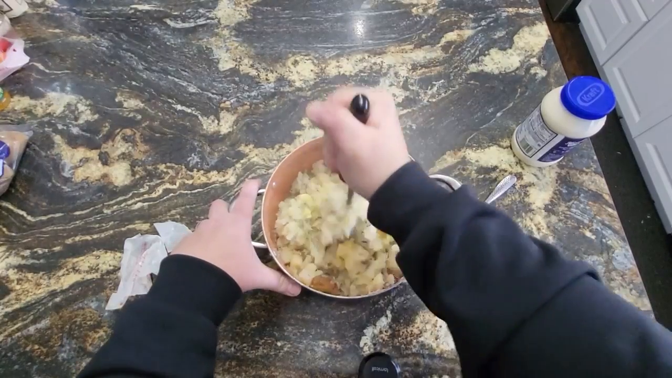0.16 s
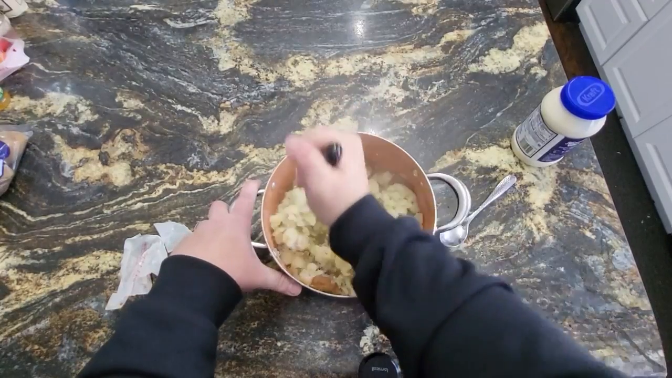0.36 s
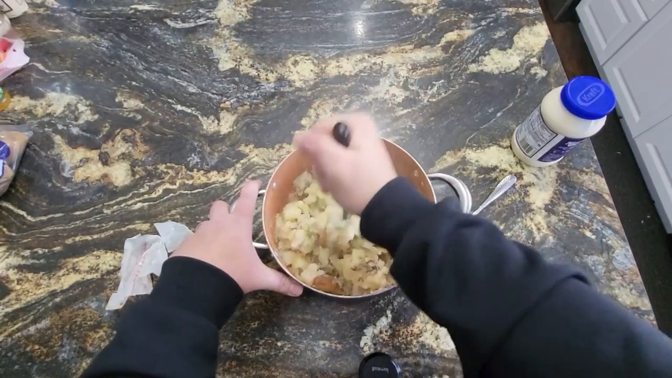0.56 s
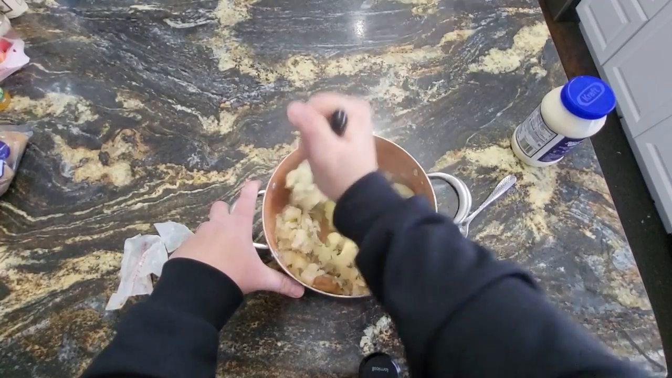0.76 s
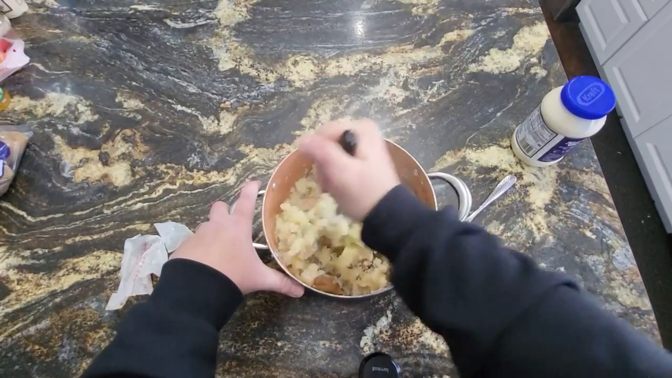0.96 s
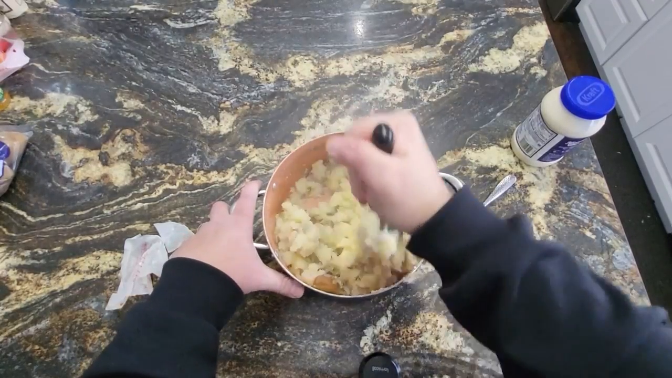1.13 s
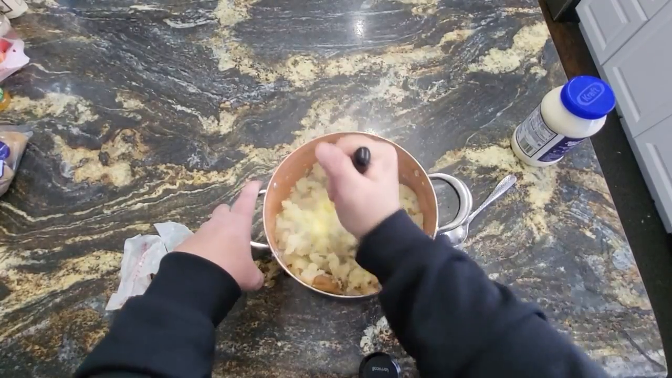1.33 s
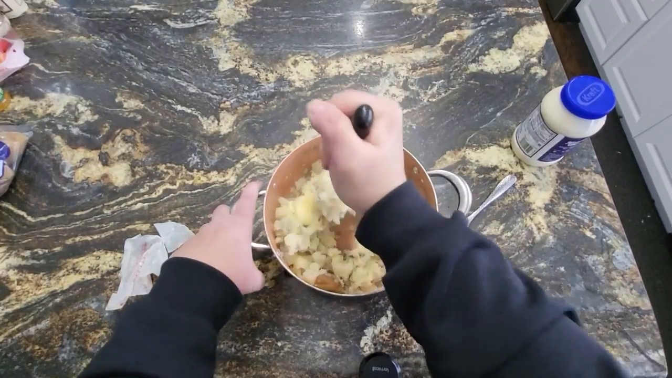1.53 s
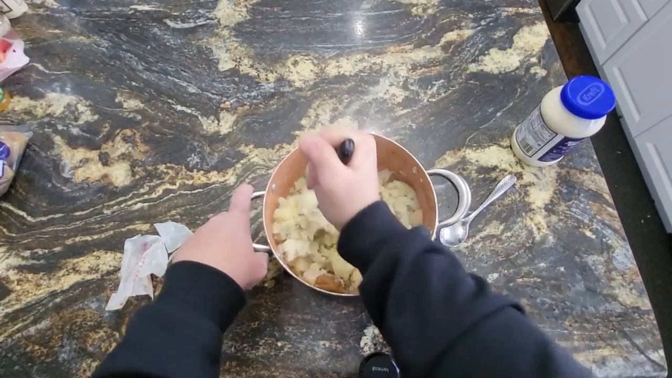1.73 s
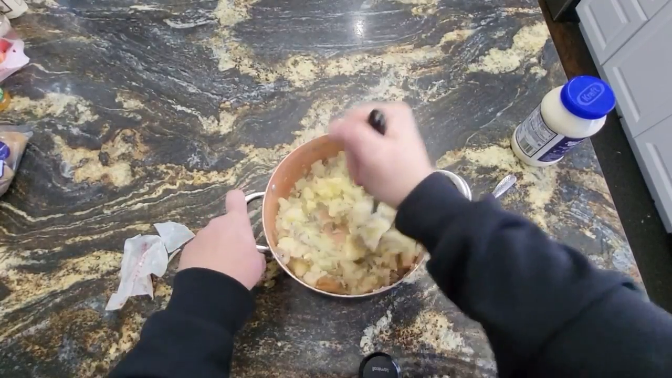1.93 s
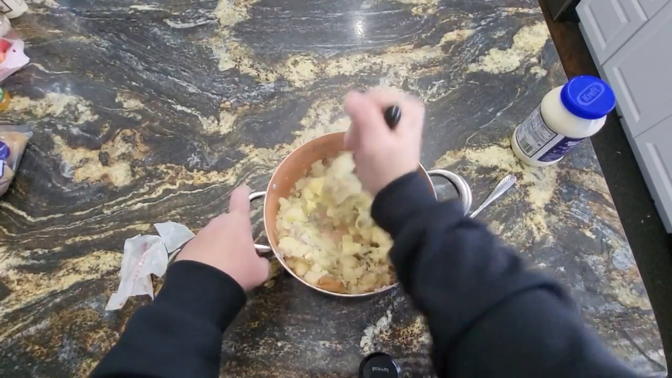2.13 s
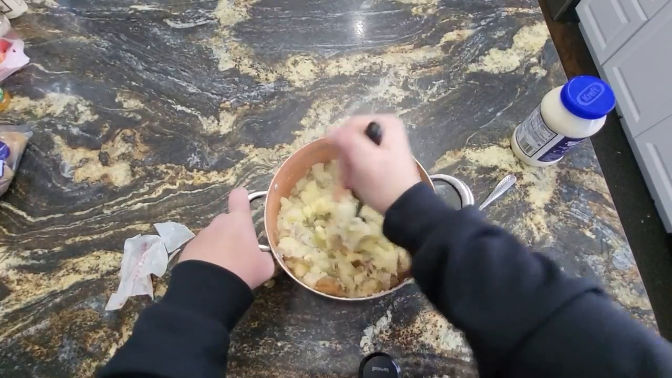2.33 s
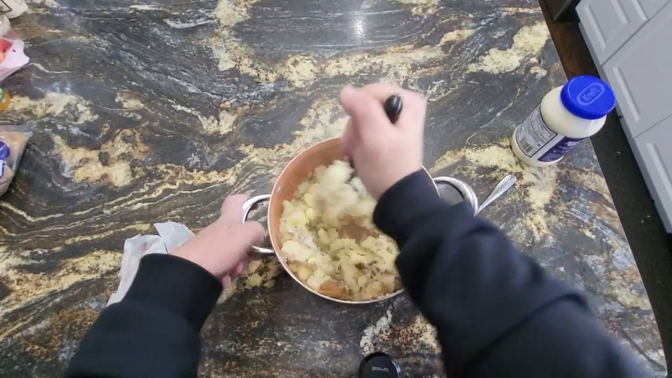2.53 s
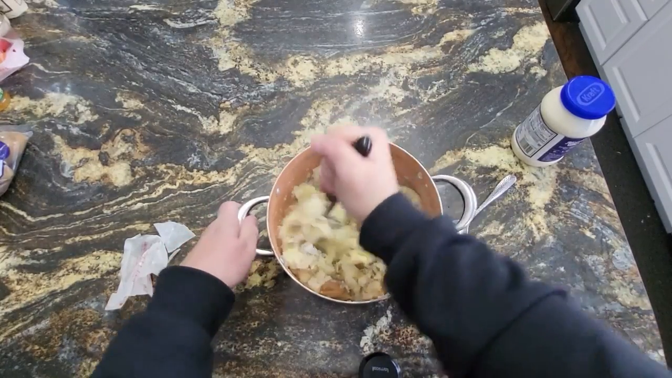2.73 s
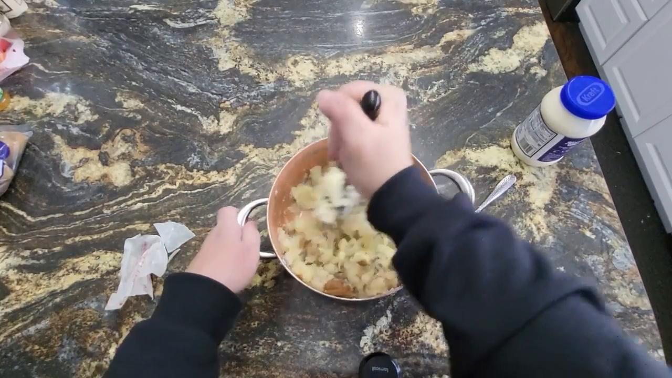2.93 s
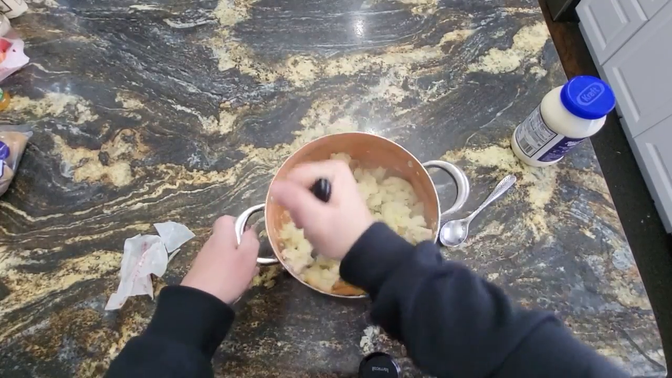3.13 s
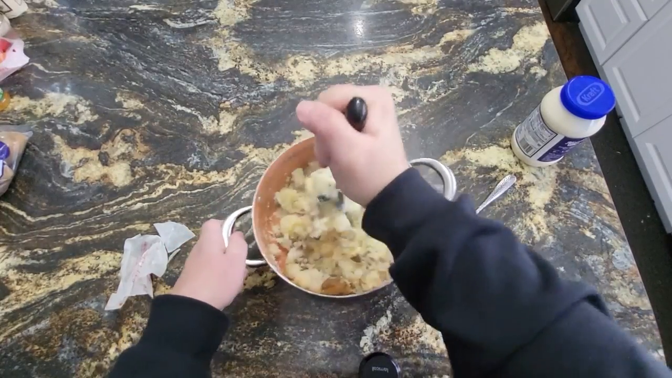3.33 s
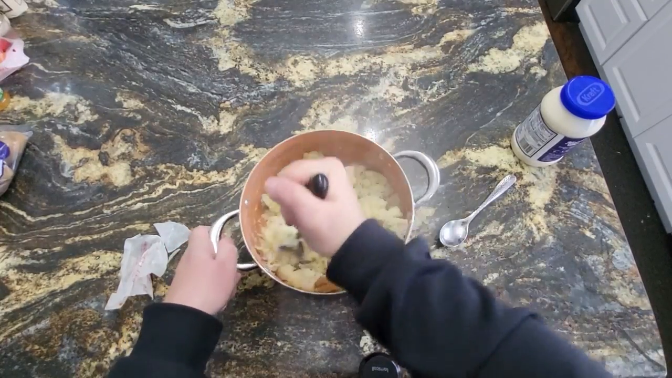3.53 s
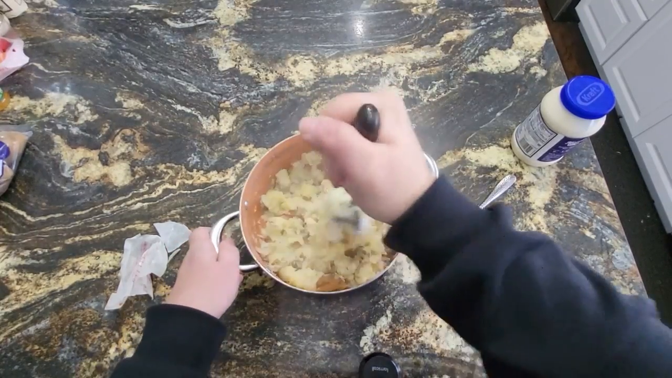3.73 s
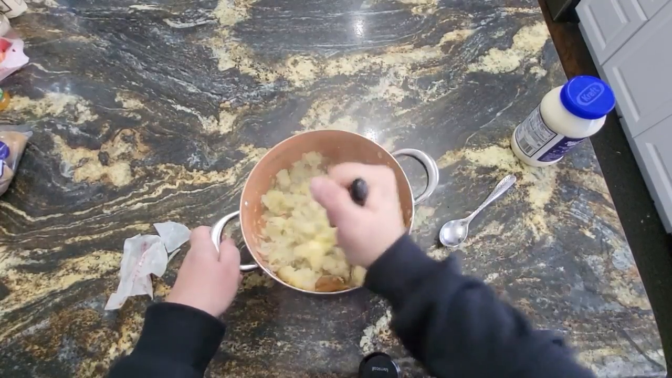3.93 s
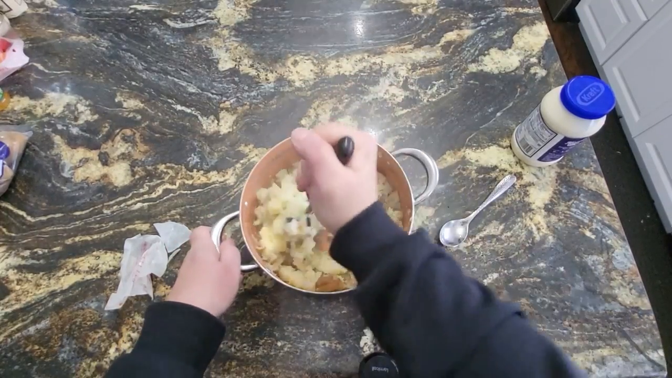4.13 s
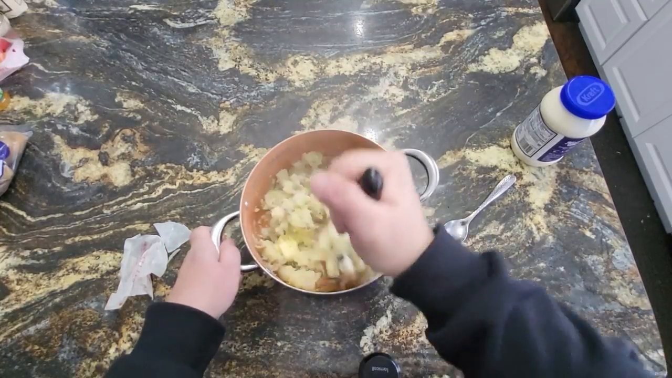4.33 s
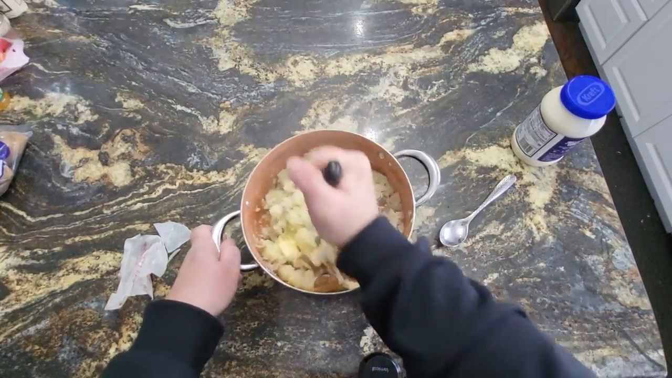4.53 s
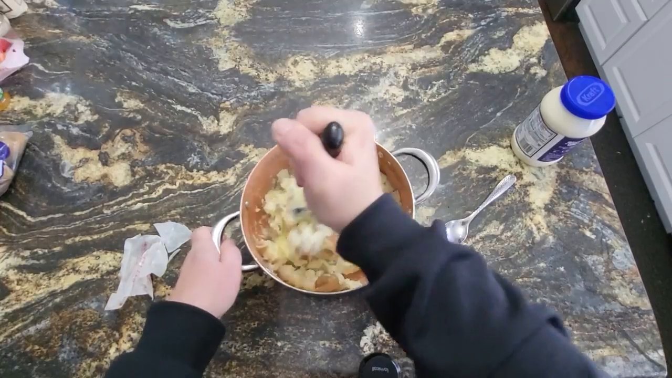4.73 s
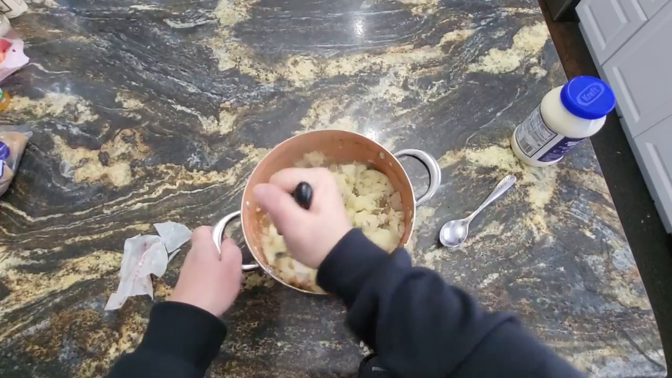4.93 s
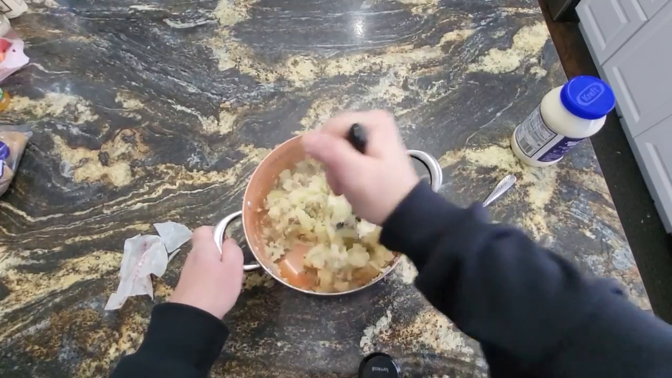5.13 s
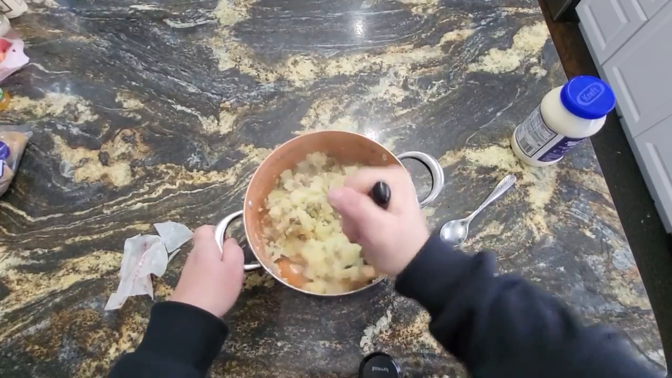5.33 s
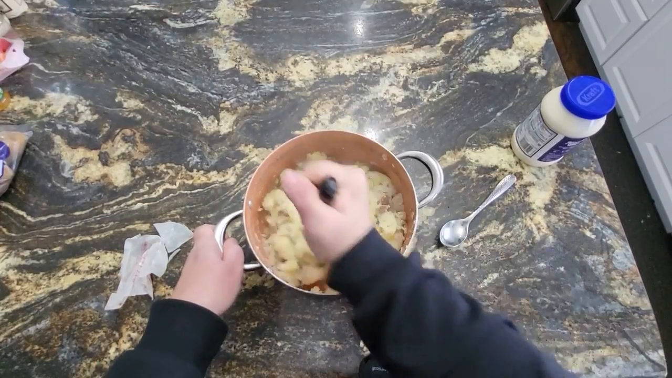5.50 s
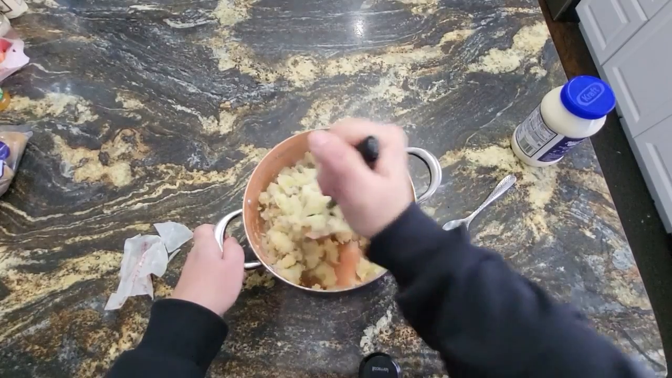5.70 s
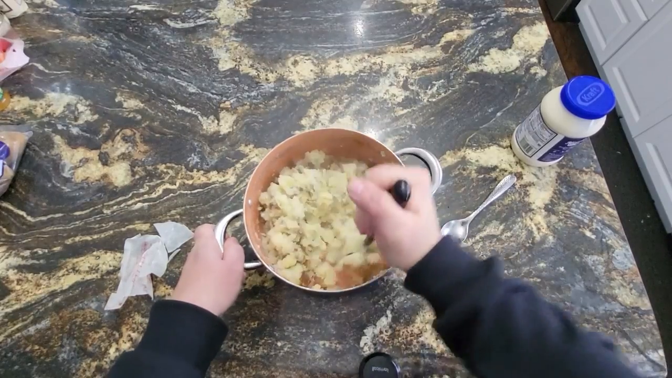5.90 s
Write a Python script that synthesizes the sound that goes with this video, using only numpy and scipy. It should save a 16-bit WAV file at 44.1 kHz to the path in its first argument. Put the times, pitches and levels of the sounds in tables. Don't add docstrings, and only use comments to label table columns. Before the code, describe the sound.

Regular heavy thuds of a masher in a pot on a stone counter, uneven in force, the first loudest. Between them potatoes ooze, squeeze and let go with tiny sticky snaps and soft bumps. Around the middle a metal spoon rattles briefly against the pot. Short kitchen echo, small nearby microphone without deep bass, faint air hiss swelling at each stroke and closing afterward.

```python
import sys
import numpy as np
from scipy import signal
from scipy.io import wavfile
from scipy.ndimage import uniform_filter1d

SR = 44100
rng = np.random.default_rng(int(sys.argv[2]) if len(sys.argv) > 2 else 0)


def dump_mix(stems):
    frames = np.atleast_2d(stems).T
    limited = np.clip(frames, -1, 1)
    pcm = np.round(limited * 32767).astype(np.int16)
    wavfile.write(sys.argv[1], SR, pcm)


def invert_db(level):
    return 10 ** (np.asarray(level, dtype=float) / 20)


N = 267246
LEAD = SR // 4
EARLY_S = -0.09


def unit(x):
    return x / np.sqrt(np.mean(x ** 2) + 1e-20)


def along(points, hz):
    f, v = np.transpose(points)
    return np.interp(np.log(hz + 1), np.log(f + 1), v)


# (frequency [Hz], likeness [0 to 1])
LEFT_RIGHT_LIKENESS = [(60, 0.68), (250, 1), (600, 0.25), (1500, 0.44), (4000, 0.11), (12000, 0.029)]
# (frequency [Hz], level [dB])
LEFT_RIGHT_LEAN = [(60, 4.5), (500, 0.5), (1200, 5), (4000, 1), (12000, -2)]


def stereo_noise(count, colour, t60=None, patchy_db=0.):
    hz, t, z = signal.stft(rng.standard_normal((2, count)), SR, nperseg=512)
    patches = uniform_filter1d(rng.standard_normal(z.shape[1:]), size=6, axis=0)
    patches = unit(uniform_filter1d(patches, size=8, axis=1))
    turn = np.arccos(np.clip(along(LEFT_RIGHT_LIKENESS, hz), 0, 1))[:, None] / 2
    mid, side = z[0] * np.cos(turn), z[1] * np.sin(turn)
    lean = along(LEFT_RIGHT_LEAN, hz)[:, None] / 2
    gain_db = along(colour, hz)[:, None] + patchy_db * patches
    if t60 is not None:
        gain_db = gain_db - 60 * t / along(t60, hz)[:, None]
    pair = np.array([(mid + side) * invert_db(lean), (mid - side) * invert_db(-lean)]) * invert_db(gain_db)
    return signal.istft(pair, SR, nperseg=512)[1][:, :count]


# (frequency [Hz], time to fall 60 dB [s])
KITCHEN_T60 = [(60, 0.34), (250, 0.34), (700, 0.36), (2000, 0.46), (5000, 0.44), (10000, 0.31)]
# (frequency [Hz], level [dB])
KITCHEN_COLOUR = [(60, -22), (130, -18.5), (250, -3.5), (600, -1.5), (900, -3), (1300, -5), (2000, -2.5),
                  (3000, -0.5), (5000, 0.5), (9000, -3)]


def add(track, s, sound, room_db, pan_db):
    tail = stereo_noise(SR // 2, KITCHEN_COLOUR, KITCHEN_T60)
    tail = np.pad(tail / np.linalg.norm(tail[0]), ((0, 0), (round(.007 * SR), 0)))
    both = invert_db(room_db) * signal.fftconvolve(sound, tail, axes=1)
    both[:, :sound.shape[1]] += sound * invert_db(np.array([[pan_db / 2], [-pan_db / 2]]))
    start = LEAD + round(s * SR)
    track[:, start:start + both.shape[1]] += both


def snap(t, low_hz, high_hz, t60, alike=.3):
    shared, own = rng.standard_normal(len(t)), rng.standard_normal((2, len(t)))
    burst = np.sqrt(alike) * shared + np.sqrt(abs(1 - alike)) * own
    burst = burst * invert_db(-60 * t / t60) * (1 - np.exp(-t / .0004))
    band = signal.butter(3, [low_hz, high_hz], "bandpass", fs=SR, output="sos")
    burst = signal.sosfilt(band, burst)
    return burst / np.linalg.norm(burst) * np.sqrt(t60 * SR / 7)


def ring(hz, modes, t, scatter_db, attack, unsteady):
    db, t60 = np.transpose(modes)[..., None]
    level = invert_db(db + scatter_db * rng.standard_normal(db.shape) - 60 * t / t60)
    drift = uniform_filter1d(rng.standard_normal((len(hz), len(t))), size=200, axis=1)
    wander = unsteady * np.cumsum(drift, axis=1) / np.sqrt(SR)
    tones = level * np.sin(2 * np.pi * np.array(hz)[:, None] * t + wander)
    return tones.sum(0) * (1 - np.exp(-t / attack))


COUNTER_HZ = [59, 91, 109, 146, 183, 205]
# (level [dB], time to fall 60 dB [s])
COUNTER_MODES = [(1.5, 0.35), (-1, 0.39), (-1.5, 0.31), (2.5, 0.22), (-11, 0.4), (-7.5, 0.29)]


def counter_ring(t, scatter_db, attack, unsteady):
    return ring(COUNTER_HZ, COUNTER_MODES, t, scatter_db, attack, unsteady)


# (time [s], open for [s], air level [dB])
OPENINGS = [(-.1, 0.25, -67), (.34, 0.29, -63), (.77, 0.23, -65.5), (1.18, 0.3, -65.5), (1.661, 0.26, -63),
            (2.13, 0.3, -63.5), (2.58, 0.25, -62), (3.0, 0.24, -62), (3.46, 0.15, -61.5),
            (3.89, 0.28, -63.5), (4.4, 0.21, -62), (4.84, 0.26, -67.5), (5.281, 0.39, -66),
            (5.88, .3, -63.5)]


def gate_db(t):
    open_db_per_s, sag_db_per_s, close_db_per_s, shut_db = 252.5, 7.5, 104, -77
    flutter_db, smooth_steps = 1.5, 25
    s, length, db = np.transpose(OPENINGS)[..., None]
    since = t - s
    opening = np.minimum(open_db_per_s * since, 0)
    sag = sag_db_per_s * np.clip(since, 0, None)
    closing = close_db_per_s * np.clip(since - length, 0, None)
    level = np.maximum((db + opening - sag - closing).max(0), shut_db)
    flutter = uniform_filter1d(rng.standard_normal(len(t)), size=smooth_steps)
    flutter = unit(uniform_filter1d(flutter, size=smooth_steps))
    return uniform_filter1d(level, size=smooth_steps) + flutter_db * flutter


# (middle time [s], length [s], squelch level [dB], squash level [dB], hum level [dB])
PULLS = [(0.037, 0.15, -71, -73, -64), (.26, .1, -85, -90, -64.5), (.66, 0.5, -70, -72, -61.5),
         (1.18, .15, -74.5, -78.5, -71.5), (1.367, .3, -67, -70, -62.5), (2.104, 0.12, -92, -79, -62.5),
         (2.362, 0.44, -67.5, -74, -61.5), (2.848, 0.51, -71, -100, -70), (3.407, 0.22, -69.5, -80, -70),
         (3.878, 0.3, -63, -68.5, -62), (4.1, 0.13, -73, -78.5, -67), (4.7, 0.41, -76.5, -84, -66),
         (4.997, 0.19, -68, -71, -78), (5.785, 0.58, -71, -72, -62)]


def pulls(t):
    s, length, *db = np.transpose(PULLS)
    edge = 3.2
    swell = np.exp(-np.abs(2 * (t - s[:, None]) / length[:, None]) ** edge)
    return invert_db(np.array(db)) @ swell


def lingering(t, db, t60):
    strikes = [(EARLY_S, EARLY_BLOW[1]), *[(row[0], row[2]) for row in BLOWS]]
    s, boom_db = np.transpose(strikes)[..., None]
    since = np.clip(t - s, 0, None)
    settle_s = 0.026
    fade = invert_db(boom_db + db - 60 * since / t60)
    return (fade * (1 - np.exp(-(since / settle_s) ** 2))).sum(0)


# (frequency [Hz], level [dB per Hz])
RUMBLE_COLOUR = [(18, -42.5), (30, -9), (86, 8), (118, -14.5), (140, -5.5), (230, -14), (300, -41),
                 (510, -120)]


def rumble_noise(gain):
    return gain * unit(stereo_noise(N, RUMBLE_COLOUR)) * invert_db(3.5)


# (frequency [Hz], level [dB per Hz])
HUM_COLOUR = [(130, -37), (220, 0), (444, 6), (572, -20), (621, -4.5), (678, -23), (829, -8), (900, -16.5),
              (1170, -53.5), (1980, -120)]


def hum_noise(gain):
    return gain * unit(stereo_noise(N, HUM_COLOUR, patchy_db=2.0)) * invert_db(-0.5)


# (frequency [Hz], level [dB per Hz])
AIR_COLOUR = [(5000, -20.5), (8500, -8.5), (9820, -7), (13100, -4.5), (15100, -3.5), (16300, -11),
              (16500, -55.5)]


def air_noise(gain):
    return gain * unit(stereo_noise(N, AIR_COLOUR, patchy_db=2.5)) * invert_db(1.5)


# (frequency [Hz], level [dB per Hz])
SQUELCH_COLOUR = [(1760, -25), (3000, -16), (4050, -3.5), (4500, -4.5), (4930, 1), (5560, -1), (8020, 0.5),
                  (9500, -27), (12400, -40.5), (20900, -120)]
# (frequency [Hz], level [dB per Hz])
SQUASH_COLOUR = [(410, -31.5), (700, -1), (944, -3), (1620, -4.5), (2110, -10.5), (2450, -6.5), (4000, -16),
                 (5200, -45), (8800, -120)]


def oozing_mash(squelch_gain, squash_gain):
    pockets = unit(uniform_filter1d(rng.standard_normal(N), size=60))
    grit = 1 + .5 * np.abs(pockets) ** 0.67
    squelch = unit(grit * stereo_noise(N, SQUELCH_COLOUR, patchy_db=1.5))
    squash = unit(grit * stereo_noise(N, SQUASH_COLOUR, patchy_db=1.2))
    return squelch_gain * squelch * invert_db(2.0) + squash_gain * squash * invert_db(10)


def background():
    step = np.arange(0, N + 64, 64) / SR
    air = invert_db(gate_db(step))
    pull_squelch, pull_squash, pull_hum = pulls(step)
    squelch = pull_squelch + air * invert_db(1)
    squash = pull_squash + invert_db(-92) + lingering(step, db=-30, t60=0.4)
    hum = pull_hum + air * invert_db(-1) + lingering(step, db=-22, t60=0.44)
    rumble = air * invert_db(-7) + pull_hum * invert_db(-6.5)
    rumble = rumble + invert_db(-71.5) + lingering(step, db=-19, t60=0.45)
    gains = (air, squelch, squash, hum, rumble)
    air, squelch, squash, hum, rumble = (np.interp(np.arange(N) / SR, step, gain) for gain in gains)
    return oozing_mash(squelch, squash) + air_noise(air) + rumble_noise(rumble) + hum_noise(hum)


# (time [s], hiss level [dB], low part level [dB], time to fall 60 dB [s])
SQUEEZES = [
    (.305, -67.5, 5, 0.86),
    (.768, -48, -1.5, 0.28),
    (1.647, -68, -0.5, 0.52),
    (1.685, -56, 1, 0.26),
    (2.578, -57, 5.5, 0.35),
    (4.374, -59, -2.5, 0.96),
    (4.842, -54.5, -7.5, 0.64),
    (5.284, -63.5, 5.5, 1),
]


def squeezes(track):
    t = np.arange(SR // 2) / SR
    for s, db, low_db, t60 in SQUEEZES:
        hiss = snap(t, 3700, 7400, t60) + invert_db(-11) * snap(t, 8400, 15800, t60)
        low = invert_db(low_db) * snap(t, 500, 5400, t60, alike=0.46)
        add(track, s, invert_db(db) * (hiss + low), room_db=-9.0, pan_db=1.0)


# (time [s], peak level [dB], pitch [Hz], low part level [dB])
TICKS = [(0.1351, -48.5, 3840, -11.5), (0.4523, -28.5, 7300, 0.5), (0.5544, -47.5, 4900, -18.5),
         (0.7677, -41.5, 6800, -12), (0.999, -57, 12700, -7), (1.4776, -53, 4950, -6),
         (1.6444, -56, 6640, -8.5), (1.6795, -31.5, 7080, -17.5), (1.9944, -59, 12800, -17.5),
         (2.303, -40.5, 5400, -1.5), (2.3337, -40, 7450, 0), (2.4548, -52.5, 6270, -13),
         (2.5782, -46.5, 7380, 6.5), (2.8682, -63, 7150, -22), (4.0782, -46.5, 6620, -3),
         (4.7855, -61.5, 6630, -16), (4.9421, -43.5, 7350, -6.5), (5.2584, -47, 7330, -15.5),
         (5.2849, -52.5, 7530, -11), (5.5328, -49, 3600, -1.5)]


def ticks(track):
    t = np.arange(SR // 4) / SR
    for s, db, hz, low_db in TICKS:
        tick = snap(t, hz / 1.2, min(hz * 1.18, 15000), t60=.014)
        low = invert_db(low_db) * snap(t, low_hz=700, high_hz=3500, t60=.015, alike=.6)
        fizz = invert_db(-17.5) * snap(t, low_hz=9150, high_hz=16500, t60=.012)
        add(track, s, invert_db(db - 2.0) * (tick + low + fizz), room_db=-4.5, pan_db=-4.0)


# (time [s], peak
# level [dB], pitch [Hz], boom level [dB])
BUMPS = [(0.013, -59, 550, 7), (0.065, -41, 902, -4), (0.552, -45, 409, -19), (1.308, -39, 800, -6),
         (1.361, -42.5, 566, -23), (3.009, -36.5, 413, 9.5), (4.012, -38, 590, -27), (4.351, -48, 790, -1),
         (4.772, -64, 401, 21.5), (4.857, -45.5, 654, -10), (4.92, -46, 600, 6), (4.994, -50.5, 1450, -16),
         (4.49, -37.5, 620, -6), (5.032, -52.5, 1410, -17), (5.64, -58, 1500, -9), (5.872, -52, 700, -10),
         (5.732, -53.5, 450, -11), (5.968, -28, 610, 0.5), (5.994, -29, 530, -4), (5.99, -33, 1430, -20)]


def bumps(track):
    t = np.arange(SR // 4) / SR
    for s, db, hz, boom_db in BUMPS:
        bump = snap(t, hz / 1.5, hz * 1.88, t60=0.067, alike=0.46)
        boom = invert_db(boom_db - 3.5) * counter_ring(t, scatter_db=3.5, attack=0.011, unsteady=2.5)
        add(track, s, invert_db(db - 1.0) * (bump + boom), room_db=-9.0, pan_db=4.0)


# (time [s], level [dB])
SPOON_HIT = (3.0082, -28)
SPOON_HZ = [953, 1276, 3752, 4371, 4899, 5249, 5636, 7095, 7978, 9130, 10220]
# (level [dB], time to fall 60 dB [s])
SPOON_MODES = [(-4, .22), (-4, .11), (-10, .07), (-6, .12), (-5, .08), (-10, .08), (-12, .07), (-4, .05),
               (-10, .05), (-13, .12), (-15, .1)]


def spoon(track):
    t = np.arange(SR // 2) / SR
    chatter = np.abs(unit(uniform_filter1d(rng.standard_normal(len(t)), size=150)))
    scrape = snap(t, low_hz=3240, high_hz=6800, t60=0.1, alike=.2)
    scrape += invert_db(-3.0) * snap(t, low_hz=6700, high_hz=7400, t60=.05)
    scrape += invert_db(-17.5) * snap(t, low_hz=8300, high_hz=15800, t60=.07)
    tones = ring(SPOON_HZ, SPOON_MODES, t, scatter_db=3.2, attack=.0003, unsteady=6.5)
    clink = tones * (0.069 + 1.58 * chatter) + invert_db(2.0) * (.5 + chatter) * scrape
    rattle = invert_db(-4.5) * snap(t, low_hz=750, high_hz=1900, t60=0.2, alike=0.5)
    s, db = SPOON_HIT
    add(track, s, invert_db(db) * (clink + rattle), room_db=-2, pan_db=-5.0)


def click(t, low_hz, high_hz):
    blow = np.zeros((2, len(t)))
    moments = rng.integers([4, 0, 30, 30], [9, 4, 60, 60])
    blow[[0, 1, 0, 1], moments] = -1, -1, .2, .2
    pulse = signal.sosfilt(signal.butter(2, low_hz, "highpass", fs=SR, output="sos"), blow)
    pulse = signal.sosfilt(signal.butter(7, high_hz, fs=SR, output="sos"), pulse)
    return pulse / np.abs(pulse).max()


def bottom_knock(t, db):
    contact = invert_db(-60 * (t / 0.0059) ** 2) * (1 - np.exp(-(t / 0.0011) ** 2))
    thud = contact * np.sin(2 * np.pi * 660 * t)
    after = invert_db(-7.0 - 60 * t / 0.011) * np.sin(2 * np.pi * 930 * t)
    return -invert_db(db + 2.0) * (thud + after)


POT_HZ = [366, 460, 513, 592, 655, 692, 947, 1637, 1911]
# (level [dB], time to fall 60 dB [s])
POT_MODES = [(-1, .16), (-5, .14), (-4, .18), (-2, .17), (-4, .15), (-4, .15), (-13, .15), (-15, .1),
             (-15, .07)]


def pot_ring(t, db):
    return invert_db(db) * ring(POT_HZ, POT_MODES, t, scatter_db=3.0, attack=0.002, unsteady=12)


def counter_boom(t, boom_db):
    late = np.clip(t - .0033, 0, None)
    punch = invert_db(8.5 - 60 * late / 0.09) * np.sin(2 * np.pi * 118 * late)
    return invert_db(boom_db - 3) * (punch + counter_ring(late, scatter_db=1.2, attack=.003, unsteady=2))


def nylon_rasp(t, boom_db, rasp_hz):
    level_db = 3.5 + 1.152 * boom_db + 3.5 * np.log2(rasp_hz / 1700)
    hit = invert_db(8.0) * click(t, low_hz=780, high_hz=1.464 * rasp_hz)
    rub = invert_db(-4.5) * snap(t, low_hz=880, high_hz=1.366 * rasp_hz, t60=0.028, alike=.3)
    return invert_db(level_db) * (hit + rub)


def hard_crack(t, crack_db):
    crack = invert_db(7.5) * click(t, low_hz=2740, high_hz=7600)
    crack += invert_db(-2.5) * snap(t, low_hz=2820, high_hz=8200, t60=.01)
    crack += invert_db(-19) * snap(t, low_hz=8200, high_hz=15800, t60=0.0068)
    return invert_db(crack_db) * crack


# (knock level [dB], boom level [dB], crack level [dB], rasp pitch [Hz])
EARLY_BLOW = (-8.5, -27.5, -41.5, 1812.5)
# (time [s], knock level [dB], boom level [dB], crack level [dB], rasp pitch [Hz])
BLOWS = [(0.345, 0, -14.5, -25.5, 1790), (0.794, -10.5, -17.5, -45, 1520), (1.234, -16.5, -36, -37.5, 1840),
         (1.7193, -4, -22.5, -34.5, 1580), (2.152, -9.5, -22, -38, 1450), (2.611, -10.5, -16, -37.5, 1780),
         (3.055, -7.5, -19, -28.5, 1750), (3.465, -2, -18, -29, 1920), (3.932, -13.5, -29.5, -40.5, 1230),
         (4.404, -10.5, -21.5, -38, 1160), (4.843, -45.5, -42.5, -50, 1495), (5.3433, -9, -22, -28.5, 1790),
         (5.8902, -4, -17, -24, 1620)]


def blows(track):
    t = np.arange(SR // 2) / SR
    to_right = invert_db([[-2.5], [2.5]])
    for s, db, boom_db, crack_db, rasp_hz in [(EARLY_S, *EARLY_BLOW), *BLOWS]:
        knock = bottom_knock(t, db)
        pot = pot_ring(t, (db + boom_db) / 2 - 14.5)
        boom = counter_boom(t, boom_db)
        rasp = nylon_rasp(t, boom_db, rasp_hz)
        crack = hard_crack(t, crack_db)
        sound = knock + pot + boom + rasp * to_right + crack * to_right
        add(track, s + .0008, sound, room_db=-2.5, pan_db=2.7)


def scene():
    track = np.zeros((2, N + 2 * SR))
    squeezes(track)
    ticks(track)
    bumps(track)
    spoon(track)
    blows(track)
    return background() + track[:, LEAD:LEAD + N]


def roll_off(x):
    return signal.sosfilt(signal.butter(12, 16780, fs=SR, output="sos"), x)


def record(dry):
    heard = signal.sosfilt(signal.butter(4, 46, "highpass", fs=SR, output="sos"), dry)
    held = heard / (1 + np.abs(heard / .97) ** 8) ** (1 / 8)
    held = signal.sosfiltfilt(signal.butter(24, 15750, fs=SR, output="sos"), held)
    return roll_off(held)


dry = scene()
out = record(dry)
dump_mix(out)
```